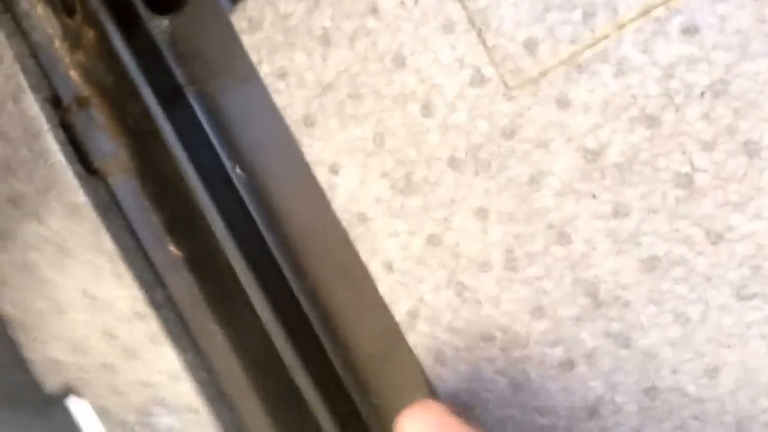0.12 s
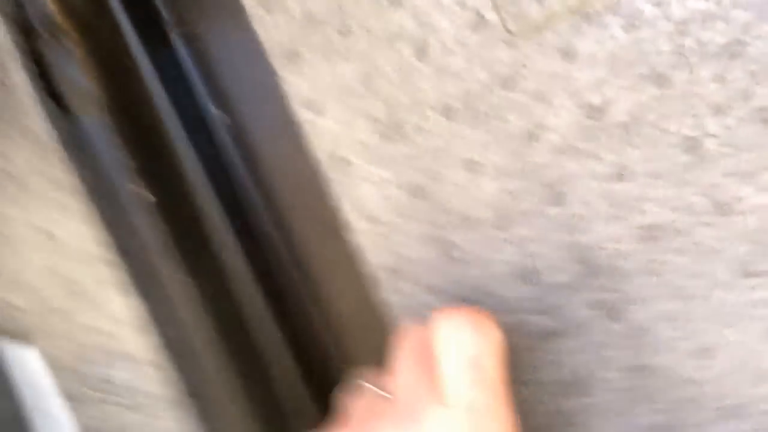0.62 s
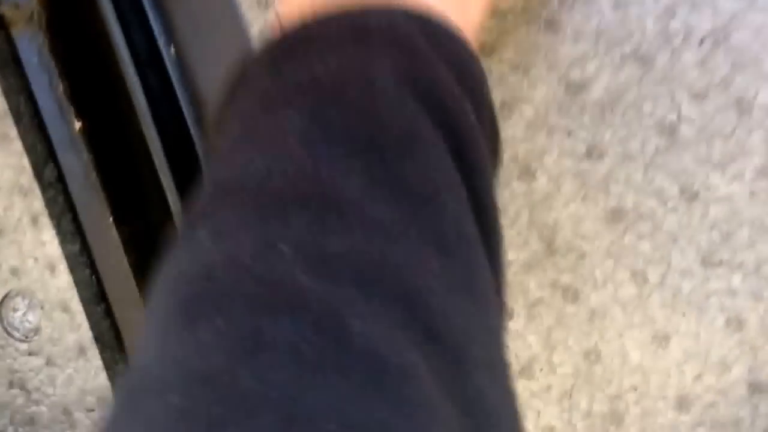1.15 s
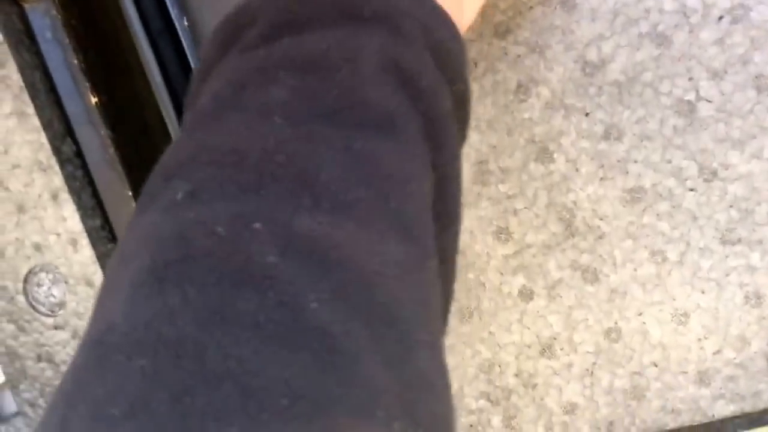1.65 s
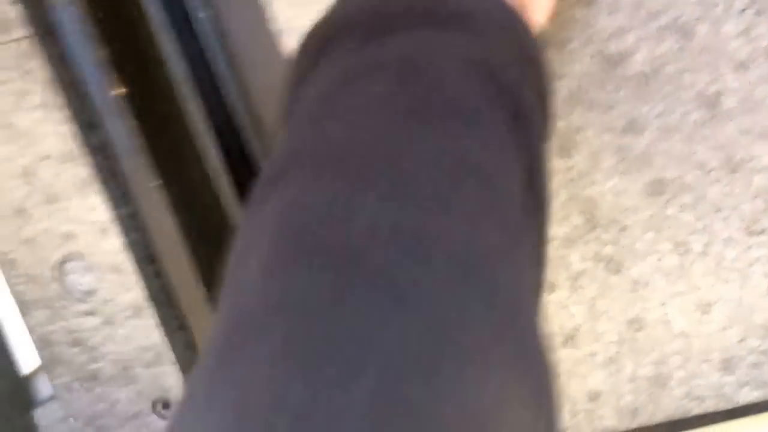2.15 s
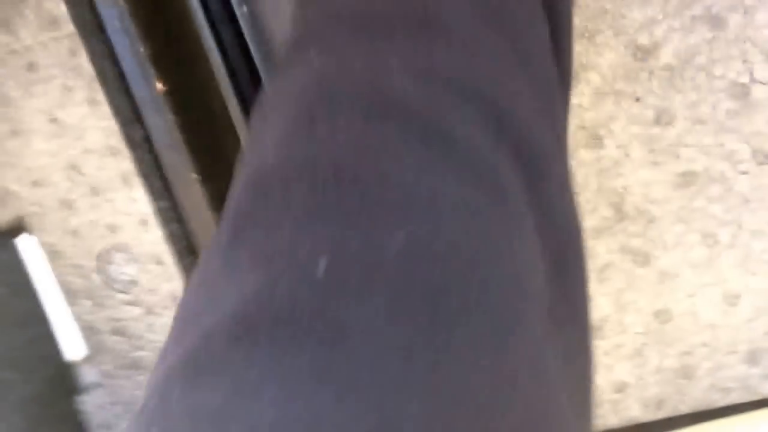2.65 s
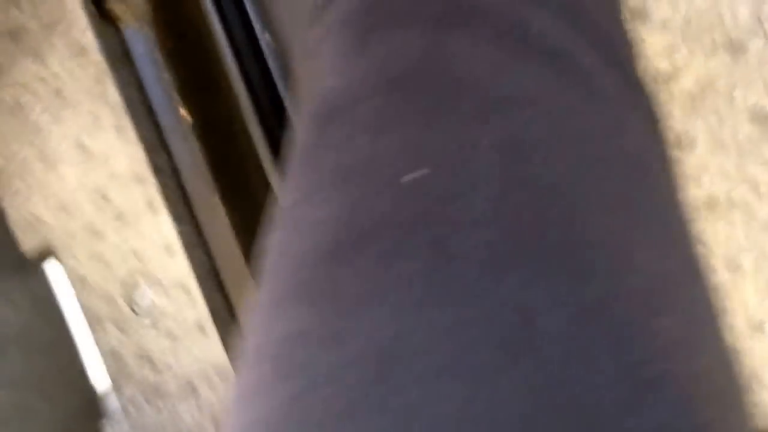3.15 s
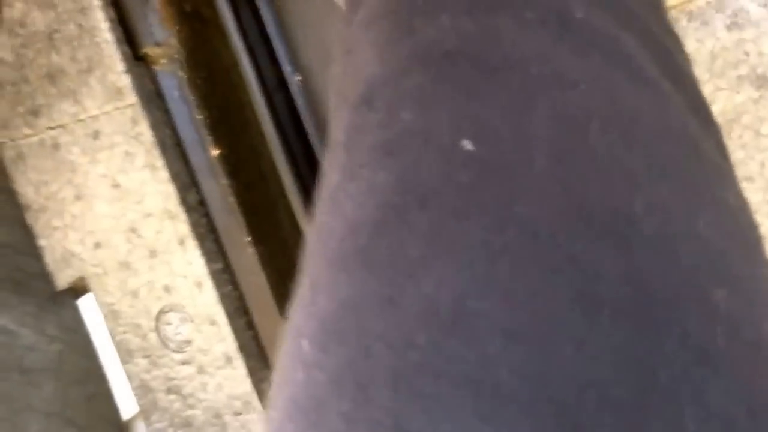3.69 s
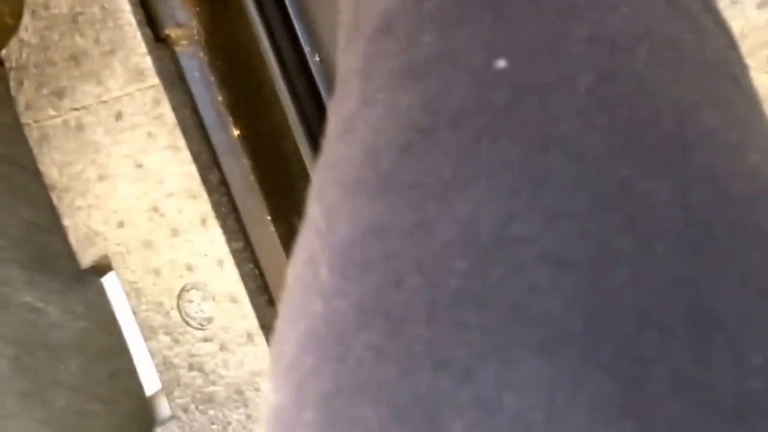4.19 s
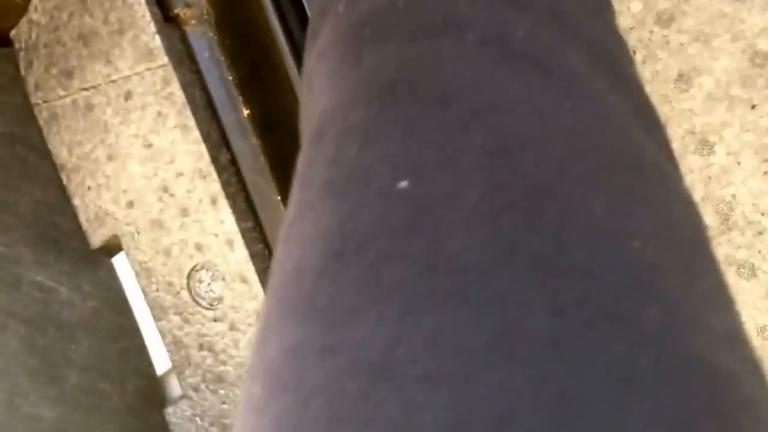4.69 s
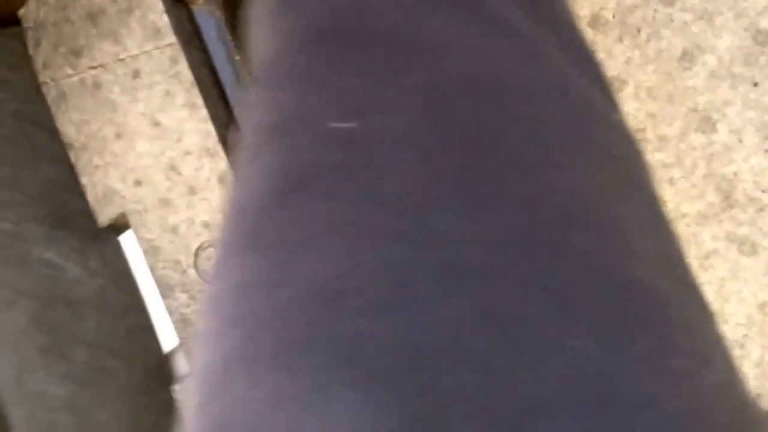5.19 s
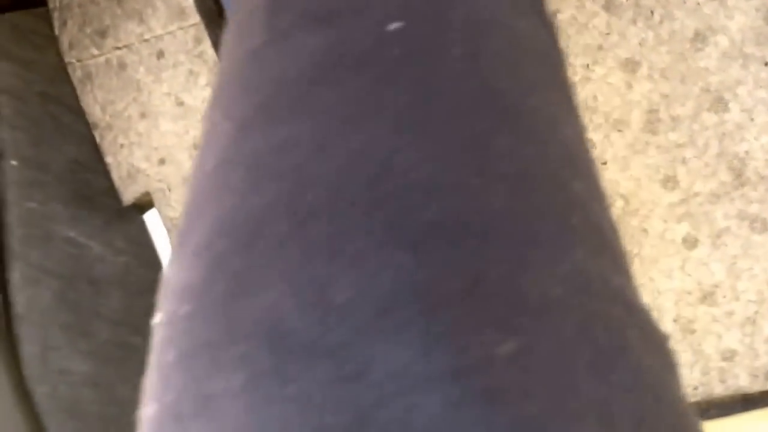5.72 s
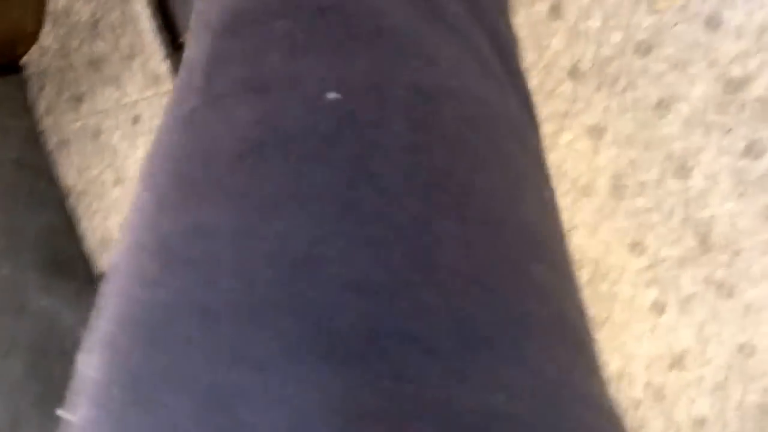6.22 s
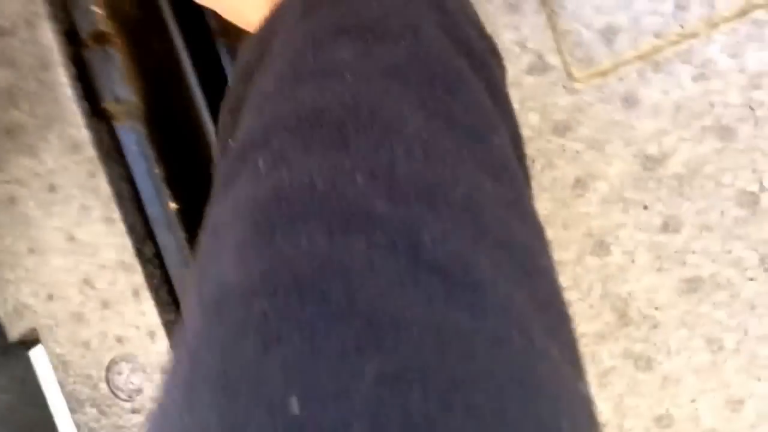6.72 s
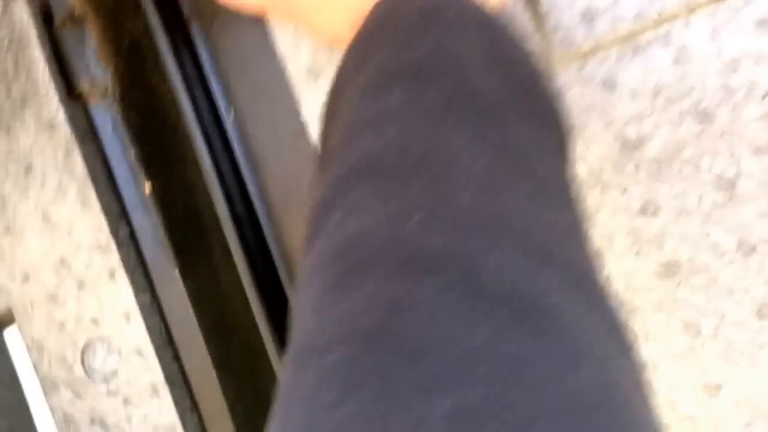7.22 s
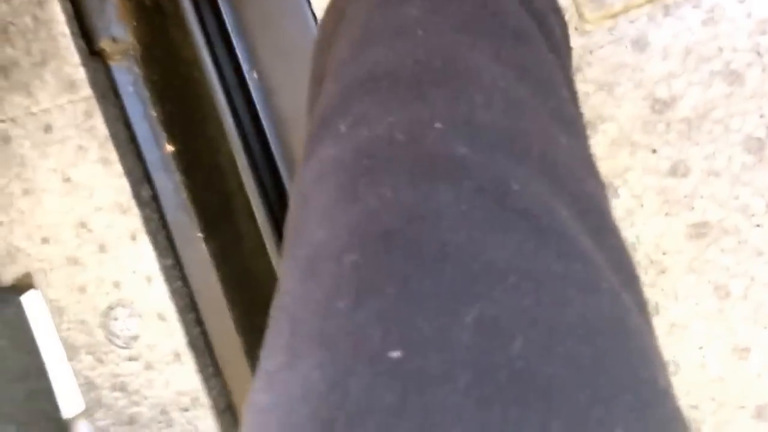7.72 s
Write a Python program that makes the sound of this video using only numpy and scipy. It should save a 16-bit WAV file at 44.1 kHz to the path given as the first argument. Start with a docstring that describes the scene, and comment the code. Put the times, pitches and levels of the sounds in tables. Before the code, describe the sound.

Foam rubbed and wrenched by hand in a quiet car cabin: gritty scrapes, short squeaks, and two loud hollow thumps near two and seven and a half seconds.

```python
"""Cabin of a parked car: a hand scrapes and tugs a stiff foam block loose from the floor.
Random catches of the foam make its hiss and shake the block's modes into groans; squeaks are unsteady tones.
Slips are rattles of contacts that ring the hollow block and boom the floor; struck modes make plastic ticks.
Soft low jolts come through the hand; shaped noise gives a low rumble and a faint hiss."""
import sys
import numpy as np
from scipy import signal
from scipy.io import wavfile
from scipy.ndimage import uniform_filter1d

SR = 44100
rng = np.random.default_rng(int(sys.argv[2]) if len(sys.argv) > 2 else 0)


def output_pcm(signal):
    """Save a mono or channel-first signal as 16-bit PCM at the path in sys.argv[1].

    Samples are clipped to [-1, 1] before scaling.
    """
    pcm = np.clip(np.atleast_2d(signal).T, -1, 1) * 32767
    wavfile.write(sys.argv[1], SR, np.round(pcm).astype(np.int16))


def ratio(d):
    """dB to gain"""
    e = np.asarray(d, float) / 20
    return 10 ** e


N = 346626

# Cabin noise spectrum. Each row: frequency in Hz, relative density in dB per Hz.
CABIN_SPECTRUM = [(12, -42), (20, -18), (65, 5), (96, 8), (123, -2), (216, -11.5), (285, -13.5), (600, -21),
                  (1290, -22.5), (1610, -59.5), (2390, -13.5), (2910, -35.5), (3250, -30), (9400, -34.5),
                  (14700, -35.5), (17000, -48)]
# Jolts through the hand. Each row: start in seconds, level before decay in dB.
JOLTS = [(0.13, -36), (0.741, -32), (1.086, -34), (1.628, -34), (1.715, -38), (2.095, -30), (2.249, -28.5),
         (3.194, -33.5), (7.552, -36)]
# Plastic ticks. Each row: start in seconds, level in dB ahead of a trim common to all.
TICKS = [(6.019, -41), (6.048, -46), (7.306, -25.5), (7.3473, -29.5), (7.3662, -46), (7.768, -51),
         (7.8524, -43)]
# Modes of a plastic clip. Each row: frequency in Hz, relative level in dB, t60 in seconds.
CLIP_MODES = [(1950, -4, .011), (2600, -7, .01), (3500, 0, .012), (6400, -1, .011), (8200, -9, .007),
              (9900, -11, .007), (11700, -10, .01)]
# Squeaks of foam on trim. Each row: start in seconds, length in seconds, mid pitch in Hz, gain in dB.
SQUEAKS = [(0.139, 0.05, 5300, -47), (0.188, 0.075, 5430, -54), (0.7, 0.042, 5070, -50.5),
           (0.711, 0.057, 3430, -49.5), (0.86, 0.023, 900, -50), (1.652, 0.056, 1010, -45),
           (2.157, 0.014, 1050, -40), (2.404, 0.033, 1800, -41.5), (4.36, 0.051, 5150, -42.5),
           (2.09, 0.0075, 2740, -37), (4.352, 0.035, 2130, -38.5), (4.374, 0.037, 2600, -42),
           (5.964, 0.027, 2318, -49), (6.094, 0.061, 3900, -51.5), (6.403, 0.022, 1105, -43),
           (6.411, 0.03, 3100, -49), (6.42, 0.022, 2210, -52), (6.491, 0.023, 2564, -39),
           (7.135, 0.027, 2445, -42), (7.156, 0.02, 2250, -43.5), (7.527, .014, 2215, -40),
           (7.533, 0.0083, 2950, -44)]
# Strokes over the foam. Each row: fastest moment in seconds, speeding up in seconds, slowing down in seconds,
# surface hiss in dB, pressure as groan over hiss in dB.
STROKES = [(.19, 0.22, 0.18, -44, -7.5), (.05, 0.23, 0.076, -54, -4), (0.251, 0.037, 0.023, -39.5, -14),
           (.41, 0.56, .03, -54, -1.5), (.575, 0.26, 0.042, -61.5, 2.5), (0.736, 0.066, 0.086, -39.5, -15),
           (.92, 0.31, 0.25, -66.5, 14), (1.075, 0.28, 0.18, -51, -27), (1.26, 0.2, 0.41, -49.5, -7),
           (1.396, 0.076, 0.018, -50.5, 3.5), (1.54, 0.13, 0.085, -48.5, -1),
           (1.666, 0.042, 0.11, -48.5, 3.5), (1.95, 0.2, 0.1, -58.5, -1), (2.08, 0.069, 0.13, -46, -6.5),
           (2.175, 0.063, 0.24, -51, -4.5), (2.37, 0.091, 0.05, -50, -5), (2.42, 0.02, 0.038, -42, -3),
           (2.618, 0.13, 0.43, -48, -5.5), (2.857, 0.023, 0.25, -53.5, 2), (3.05, 0.084, 0.26, -58.5, 1.5),
           (3.202, 0.053, 0.25, -43.5, -7), (3.405, 0.059, 0.079, -46.5, -4), (3.66, 0.28, 0.12, -70, 5),
           (3.83, 0.12, 0.37, -60, 4.5), (4.0, 0.12, 0.4, -61.5, 5), (4.188, 0.045, 0.062, -48.5, -8.5),
           (4.368, 0.084, 0.1, -42.5, 2), (4.536, 0.14, 0.15, -50, 2.5), (4.722, 0.087, 0.14, -42.5, -10),
           (4.8, 0.075, 0.062, -53.5, 4.5), (5.03, 0.32, 0.12, -57.5, -1), (5.108, 0.033, 0.048, -51, 5),
           (5.2, 0.083, 0.26, -54.5, 8), (5.29, 0.14, 0.14, -57.5, 4), (5.439, 0.044, 0.14, -64.5, 13),
           (5.638, 0.058, 0.082, -64.5, 3), (5.8, 0.16, 0.2, -57.5, -3.5), (5.974, 0.041, 0.026, -40, -10),
           (6.135, 0.16, 0.097, -49, -5.5), (6.235, 0.12, 0.14, -51, 1), (6.387, 0.13, 0.12, -43, -4),
           (6.505, 0.085, 0.14, -52.5, 2), (6.605, 0.13, 0.11, -51.5, -6), (6.76, 0.059, 0.079, -50.5, -18),
           (6.912, 0.33, 0.16, -63.5, 5.5), (6.97, .1, 0.47, -63.5, -4), (7.149, 0.076, 0.046, -56, 7.5),
           (7.333, 0.028, 0.23, -68, -8.5), (7.5, 0.2, 0.044, -62, 15), (7.78, 0.046, 0.15, -63.5, -35.5)]
# Foam hiss spectrum. Each row: frequency in Hz, relative density in dB per Hz.
HISS_SPECTRUM = [(1180, -47), (2000, -1.5), (3010, -4), (5160, -2), (6310, -6), (14500, -9.5), (17000, -22)]
# Modes of the hollow block when struck. Each row: frequency in Hz, relative level in dB, t60 in seconds.
BLOCK_MODES = [(115, -8, .15), (172, -2, .1), (260, -4, .07), (305, -2, .08), (340, 0, .07), (445, -3, .07),
               (475, -3, .08), (520, -6, .07), (680, -4, .06), (750, 0, .06), (820, -5, .06),
               (915, -5, .05), (1100, -6, .05), (1250, -8, .05), (1455, -6, .05), (1550, -5, .05),
               (1750, -2, .05), (2060, -5, .045), (2410, -6, .045), (2600, -10, .04), (3040, -10, .035),
               (3400, -8, .035), (3840, -8, .028), (4480, -14, .022)]
# Where the grip lets the block ring best. Each row: time in seconds, low centre in Hz, middle centre in Hz.
GRIP = [(0, 288, 1240), (.8, 297, 1210), (.92, 480, 900), (1.08, 474, 1090), (1.3, 300, 1230),
        (1.67, 345, 1050), (1.72, 292, 686), (1.96, 387, 780), (2.02, 470, 800), (2.1, 201, 1990),
        (2.25, 325, 780), (2.42, 294, 724), (2.75, 330, 1020), (3.2, 270, 1000), (3.9, 440, 1760),
        (4.0, 455, 716), (4.26, 310, 1280), (4.38, 344, 830), (4.55, 428, 740), (5.03, 390, 620),
        (5.11, 483, 1760), (5.2, 352, 1410), (5.5, 380, 980), (5.6, 480, 630), (6.1, 430, 1720),
        (6.24, 468, 700), (6.33, 456, 650), (6.38, 346, 1210), (6.62, 315, 1500), (6.9, 496, 1080),
        (7.15, 475, 980), (7.4, 495, 750), (7.52, 475, 770), (7.54, 190, 820)]
# Knocks. Each row: start in seconds, thud (lowest band) in dB, ring (second band) in dB,
# hardness as slope above the ring in dB per bent octave, contact time scale in ms.
KNOCKS = [(0.21, -30.5, -48, -33, 6.1), (.414, -36.5, -40, -0.5, 4.7), (0.57, -43.5, -57.5, 2.5, 2.1),
          (0.744, -23.5, -44, -14, 0.98), (0.779, -39, -53, -14, 5.2), (0.914, -35.5, -44, -10, 0.99),
          (1.067, -43, -51, -1, 2.1), (1.076, -33, -36.5, -2, 4), (1.258, -51, -45.5, 1.5, 3.7),
          (1.282, -29.5, -67, -7, 1.2), (1.387, -37.5, -43.5, -19.5, 4), (1.617, -43.5, -45.5, 4.5, 0.88),
          (1.659, -43, -48, -4, 2), (1.72, -33.5, -45, -5, 1.3), (1.776, -43.5, -38, -12.5, 0.33),
          (1.816, -42, -53, -17, 0.9), (1.833, -42, -34, -20, 0.8), (1.957, -46, -32.5, -10.5, 3.9),
          (2.013, -51, -49, -15, 3.1), (2.0909, -25.5, -28, -16, 1.5), (2.0947, -11, -12.5, -0.5, 3.36),
          (2.165, -62, -41, -1, 3.7), (2.25, -21.5, -19, -6.5, 1.03), (2.406, -36, -43, -0.5, 1.7),
          (2.419, -26, -62, -11, 1.1), (2.427, -49, -38, 0, 2.5), (2.449, -42, -35, -5.5, 1.2),
          (2.749, -32.5, -33, -2.5, 2.1), (2.855, -40, -63, -9, 1.9), (3.0145, -37.5, -41, 3, 5.1),
          (3.031, -47, -44.5, 3, 10.5), (3.197, -33, -39, -2.5, 8.5), (3.24, -37.5, -38, -15, 2.8),
          (3.272, -45, -40.5, -3.5, 6), (3.378, -44.5, -66, 5, 6.2), (3.424, -53, -47.5, -15, 6.7),
          (3.905, -52, -43.5, 4, 2.1), (4, -34.5, -35, -3, 6.7), (4.262, -41.5, -54, 1.5, 3.3),
          (4.532, -50, -39.5, -27, 41), (4.792, -50, -44.5, -8, 2.3), (5.03, -36.5, -46, -5, 8.7),
          (5.106, -51, -37.5, -4.5, 4.9), (5.179, -49, -35, -6.5, 29), (5.49, -35, -35, -5.5, 11),
          (5.603, -43.5, -47.5, -4, 1.4), (5.735, -49, -45, -8, 3.9), (5.854, -72, -46, -0.5, 3.5),
          (6.096, -55, -51, -8, 1.7), (6.244, -42, -59, -6, 3.4), (6.257, -45, -58, 0, 3.4),
          (6.279, -39.5, -61, 1, 1.8), (6.306, -40, -60, -8, 5.5), (6.377, -36, -34.5, -1.5, 0.39),
          (6.497, -65, -42, 1.5, 5.3), (6.543, -48, -45, -14, 2.1), (6.58, -40.5, -45.5, -13, 6.2),
          (6.612, -39, -60, -7, 3), (6.336, -42.5, -53, -4, 4.5), (6.898, -39.5, -49, -3.5, 8.5),
          (7.13, -36.5, -38, -6.5, 2.8), (7.139, -45, -33.5, -7, 11), (7.16, -35, -36.5, -17, 0.37),
          (7.4, -49, -47, -18, 0.81), (7.412, -40, -47, -3, 0.64), (7.428, -40, -36, -18, 1),
          (7.439, -44, -32.5, -21.5, 0.84), (7.455, -33, -36, -2.5, 0.63), (7.476, -42, -33, -17, 1.2),
          (7.494, -39, -36, -15, 2.4), (7.507, -41.5, -32.5, -17.5, 0.84), (7.525, -33, -33.5, -11.5, 0.77),
          (7.539, -24.5, -26.5, -5, 2.6), (7.543, -12, -10, -1, 3.8), (7.556, -27, -23, -3.5, 3)]
# Edges of the five knock bands, in Hz.
BAND_EDGES_HZ = [130, 540, 1600, 2900, 4400, 12500]
# What the foam passes of the three bands above the ring, in dB.
FOAM_DB = np.array([1.5, .1, -6])
# Cabin tail of a knock, before the hand stifles it. Each row: frequency in Hz, t60 in seconds.
TAIL = [(150, 0.051), (400, 0.1), (1040, 0.1), (2760, 0.039), (7280, 0.033), (14000, 0.025)]


def rms_one(x):
    """Scale to rms 1."""
    return x / np.sqrt(np.mean(x ** 2) + 1e-20)


def evened(x):
    """Hold the level over a fifth of a second at rms 1."""
    return x / np.sqrt(uniform_filter1d(x ** 2, size=SR // 5) + 1e-20)


def peak_one(blows):
    """Scale each blow so that its loudest 4 ms has rms 1."""
    power = uniform_filter1d(blows ** 2, size=176, axis=1)
    return blows / np.sqrt(power.max(axis=1, keepdims=True))


def at_hz(points, hz):
    """Read a curve on a log-frequency axis."""
    points_hz, values = np.transpose(points)
    return np.interp(np.log(hz), np.log(points_hz), values)


def in_time(rows, s):
    """Read the columns of a curve at times s."""
    times, *columns = np.transpose(rows)
    return [np.interp(s, times, c) for c in columns]


def band(x, low_hz, high_hz):
    """Causal band-pass along the last axis."""
    return signal.sosfilt(signal.butter(2, [low_hz, high_hz], "band", fs=SR, output="sos"), x)


def lay(times_s, blows):
    """Place each blow at its time."""
    out = np.zeros(N + blows.shape[1])
    for s, blow in zip(times_s, blows):
        start = round(s * SR)
        out[start:start + len(blow)] += blow
    return out[:N]


def drift(rate_hz):
    """Slow random curve of rms 1, about rate_hz turns a second."""
    r = np.exp(-80 * np.pi * rate_hz / SR)  # one step per 40 samples
    noise = rng.standard_normal(N // 40 + 2002)
    slow = signal.lfilter([1], [1, -2 * r, r * r], noise)[2000:]
    return np.interp(np.arange(N) / 40, np.arange(len(slow)), rms_one(slow))


def coloured(source, spectrum, patchy_db, rate_hz):
    """Half-octave bank at rms 1; each band has its level and flickers on its own."""
    out = 0
    edges_hz = np.append(20 * 2 ** np.arange(0, 10, .5), 19000)
    for k, (low, high) in enumerate(zip(edges_hz, edges_hz[1:])):
        level_db = at_hz(spectrum, np.sqrt(low * high))
        gain = ratio(level_db + patchy_db * drift(rate_hz))
        out = out + gain * band(source[k % 2], low, high)
    return rms_one(out)


def grains(per_s, spread_db, shape):
    """Beads of foam catch and let go: random clicks of uneven size and sign."""
    sizes = ratio(spread_db * np.minimum(rng.exponential(1, shape), 5))
    signs = rng.choice([-1, 1], shape)
    return sizes * signs * (rng.random(shape) < per_s / SR) + 1e-9


def ringing(modes, colour_db, spread_db, t):
    """One impulse response a blow: decaying sines, every mode with a new strength and sign."""
    hz, level_db, t60_s = np.transpose(modes)[:, :, None]
    rings = ratio(level_db - 60 * t / t60_s) * np.sin(2 * np.pi * hz * t)
    chance = rng.standard_normal((len(colour_db), 2, len(modes)))
    strength = ratio(colour_db + spread_db * chance[:, 0])
    return (strength * np.sign(chance[:, 1])) @ rings


def grip_db(hz, s, deepest_db):
    """Modes far from the two free centres are damped by the hand."""
    low_hz, middle_hz = in_time(GRIP, s)
    near_low = -60.0 * np.log2(hz / low_hz) ** 2
    near_middle = -20.0 * np.log2(hz / middle_hz) ** 2
    return np.maximum(np.maximum(near_low, near_middle), deepest_db)


def cabin():
    """Lumpy rumble from outside through the panels, over a faint hiss: noise in flickering bands."""
    bed = coloured(rng.standard_normal((2, N)), CABIN_SPECTRUM, patchy_db=1.3, rate_hz=9)
    rumble = band(bed, 15, 150)
    lumps = ratio(2.2 * drift(14) - .6)
    return ratio(-47.5) * (bed + rumble * (lumps - 1))


def jolts():
    """Soft push and rebound below the pitch of the block: a dying 66 Hz sine."""
    s, level_db = np.transpose(JOLTS)
    t = np.arange(SR // 8) / SR
    swing = np.sin(2 * np.pi * 66.0 * t) * ratio(-60 * t / 0.12)
    return lay(s, ratio(level_db[:, None]) * swing)


def ticks():
    """A small hard clip snaps: a few bright modes struck by a short crackle, which is heard too."""
    s, level_db = np.transpose(TICKS)
    t = np.arange(SR // 16) / SR
    fade = ratio(-60 * t / .016) + ratio(-17 - 60 * t / .07)   # snap and cabin tail
    crackle = rng.standard_normal((len(s), len(t))) * fade
    modes = ringing(CLIP_MODES, 0 * s[:, None], 1.07, t)
    rings = signal.fftconvolve(modes, crackle, axes=1)[:, :len(t)]
    blows = peak_one(rings) + ratio(-2) * peak_one(band(crackle, 500, 13000))
    return lay(s, ratio(level_db[:, None] - 8.5) * blows)


def squeaks():
    """Fast stick and slip: an unsteady tone that swells, climbs a little and fades."""
    blur_hz, climb = 14000, .06   # pitch at which the tone is as wide as it is high; share of pitch climbed
    s, length_s, hz, gain_db = np.transpose(SQUEAKS)[:, :, None]
    t = np.arange(SR // 10) / SR
    part = np.minimum(t / length_s, 1)
    chance = rng.standard_normal((len(s), 2, len(t)))
    wobble = []
    for pitch_hz, (a, b) in zip(hz[:, 0], chance):
        low_pass = signal.butter(2, pitch_hz ** 2 / blur_hz / 2, fs=SR, output="sos")
        wobble.append(signal.sosfilt(low_pass, a + 1j * b))
    wobble = np.array(wobble) * np.median(hz) / hz
    unsteady = .6 + rms_one(wobble.real) + 1j * rms_one(wobble.imag)
    tone = unsteady * np.exp(2j * np.pi * hz * t * (1 + climb * (part - 1) / 2))
    return lay(s[:, 0], ratio(gain_db) * tone.real * np.sin(np.pi * part ** 0.63))


def strokes(s):
    """Hiss, groan and drag gains: strokes swell and fade, and the block shudders on after each knock."""
    end_db, roundness = -26, 1.18   # level at either end; 1 = pointed, 2 = round
    drag_db, drag_follows = 0.5, 0.85   # drag over hiss at no pressure; dB per dB of pressure
    groan_under_ring_db, groan_t60_s = -12.5, 0.099
    drag_under_thud_db, drag_t60_s = -8.5, 0.16
    power = np.zeros((3, len(s)))
    for top, rise, fall, hiss_db, press_db in STROKES:
        away = np.where(s < top, (top - s) / max(rise, .005), (s - top) / max(fall, .005))
        shape = ratio(2 * end_db * np.minimum(away, 9) ** roundness)
        over_hiss_db = np.array([[0], [press_db], [drag_db + drag_follows * press_db]])
        power += shape * ratio(2 * (hiss_db + over_hiss_db))
    for start, thud_db, ring_db, *_ in KNOCKS:
        since = np.maximum(s - start, 0)
        power[1] += (s > start) * ratio(2 * (ring_db + groan_under_ring_db - 60 * since / groan_t60_s))
        power[2] += (s > start) * ratio(2 * (thud_db + drag_under_thud_db - 60 * since / drag_t60_s))
    return np.sqrt(power)


def sliding():
    """Fine catches give the hiss; coarser, clumped ones shake the modes of the block, each fading in and out."""
    s = np.arange(N) / SR
    hiss_gain, groan_gain, drag_gain = (np.interp(s, s[::64], g) for g in strokes(s[::64]))
    fine = grains(7000, 2.2, (2, N)) * ratio(1.8 * drift(47))
    hiss = coloured(fine, HISS_SPECTRUM, patchy_db=2.2, rate_hz=20.6)
    catches = grains(1900 * ratio(2.7 * drift(57)), 2.6, N)
    groan, drag = np.zeros((2, N))
    for k, (hz, level_db, t60_s) in enumerate(BLOCK_MODES[1:]):
        r = ratio(-60 / (0.4 * t60_s * SR))   # rubbing damps the ring
        w = 2 * np.pi * hz / SR
        push = catches * ratio(0.49 * level_db + grip_db(hz, s, -14) + 3 * drift(12))
        ring = (-1) ** k * signal.lfilter([0, np.sin(w)], [1, -2 * r * np.cos(w), r * r], push)
        if hz < BAND_EDGES_HZ[1]:
            drag = drag + ring
        else:
            groan = groan + ring
    grit = ratio(-1.5) * rms_one(band(catches, 400, 3200))
    return hiss_gain * hiss + groan_gain * (evened(groan) + grit) + drag_gain * evened(drag)


def knocks():
    """A slip is a short rattle of contacts; it rings the block and leaves a tail that dies by band."""
    grip_lost_db, grip_full_db = -5, -25   # thud that shakes the hand off; thud that feels all its damping
    slope_bend = 1.275   # the slope steepens with each octave
    held_t60_s, linger_db = 0.062, -9.5   # the hand stifles a knock after contact; what lingers in the cabin
    floor_hz, floor_t60_s, floor_db = 118.6, 0.22, -14.5   # the floor panel booms under each thud
    s, thud_db, ring_db, slope_db, contact_ms = np.transpose(KNOCKS)[:, :, None]
    octave = np.log2(BAND_EDGES_HZ)
    centre = (octave[:-1] + octave[1:]) / 2
    levels_db = [thud_db, ring_db]
    for c, foam_db in zip(centre[2:], FOAM_DB):
        levels_db.append(ring_db + slope_db * (c - centre[1]) ** slope_bend + foam_db)

    t = np.arange(SR // 7) / SR
    phase = 1000 * t / np.clip(contact_ms, .3, 15)
    contact = phase * np.exp(-2 * phase)   # swells, then dies
    rattle = grains(1800, 3.8, phase.shape) * contact
    rattle[:, 20] += .45   # a stronger early touch
    held = np.clip((grip_lost_db - thud_db) / (grip_lost_db - grip_full_db), 0, 1)
    damping_db = held * grip_db(np.array(BLOCK_MODES)[:, 0], s, -28)
    rings = signal.fftconvolve(ringing(BLOCK_MODES, damping_db, 2.5, t), rattle, axes=1)[:, :len(t)]

    white = rng.standard_normal(phase.shape)
    tail = 0
    edges_hz = np.geomspace(120, 17000, 9)
    for low, high in zip(edges_hz, edges_hz[1:]):
        fade = ratio(-60 * t / at_hz(TAIL, np.sqrt(low * high)))
        tail = tail + band(white, low, high) * fade * (low / 1000) ** 0.012
    crunch = tail * (1 - np.exp(-2.5 * phase)) * (1 + 3.9 * contact)   # dense while the faces touch
    blows = peak_one(rings) + ratio(8 - 7 * held) * peak_one(band(crunch, 466, 13000))
    after_s = np.maximum(t - 1.8 * contact_ms / 1000, 0)
    stifled = blows * (ratio(linger_db) + ratio(-60 * after_s / held_t60_s))

    boom_gain = ratio(thud_db + floor_db - 60 * t / floor_t60_s)
    out = boom_gain * np.sin(2 * np.pi * floor_hz * t) * np.minimum(t / 0.009, 1)
    for db, low, high in zip(levels_db, BAND_EDGES_HZ, BAND_EDGES_HZ[1:]):
        part = band(band(stifled, low, high), low / 2, 1.03 * high)
        out = out + ratio(db) * peak_one(part)
    return lay(s[:, 0], out)


def scene():
    """All sources at one microphone."""
    return (cabin() + jolts() + ticks() + squeaks() + sliding() + knocks())[None]


def top_cut(x):
    """Nothing passes above the cut-off."""
    return signal.sosfilt(signal.butter(12, 15520, fs=SR, output="sos"), x)


def record(dry):
    """Gain control sinks briefly after loud knocks; the converter rounds peaks near full scale."""
    from_db, share, memory_s = -42, 0.13, 0.22   # soft onset; dB taken per dB well over it; level averaging
    r = np.exp(-1 / (memory_s * SR))
    heard = signal.lfilter([1 - r], [1, -r], dry ** 2)
    levelled = dry * (1 + heard / ratio(2 * from_db)) ** (-share / 2)
    rounded = levelled / (1 + (np.abs(levelled) / .97) ** 4) ** .25
    return top_cut(rounded)


dry = scene()
out = record(dry)
output_pcm(out)
```